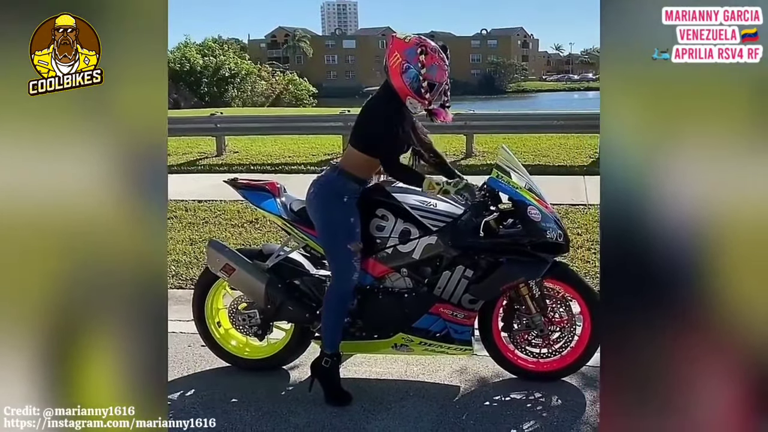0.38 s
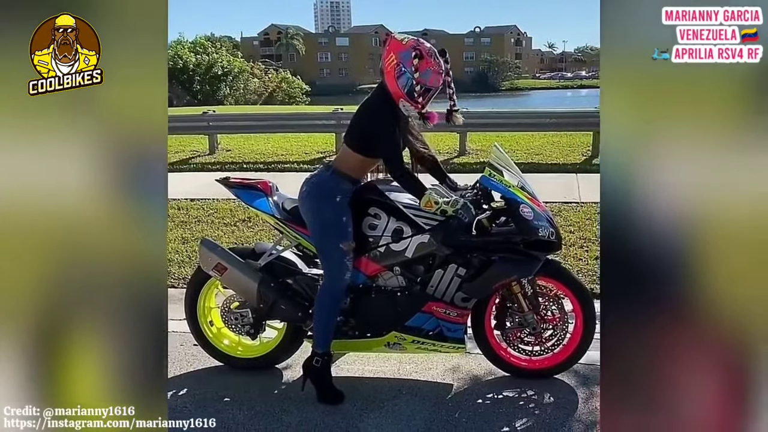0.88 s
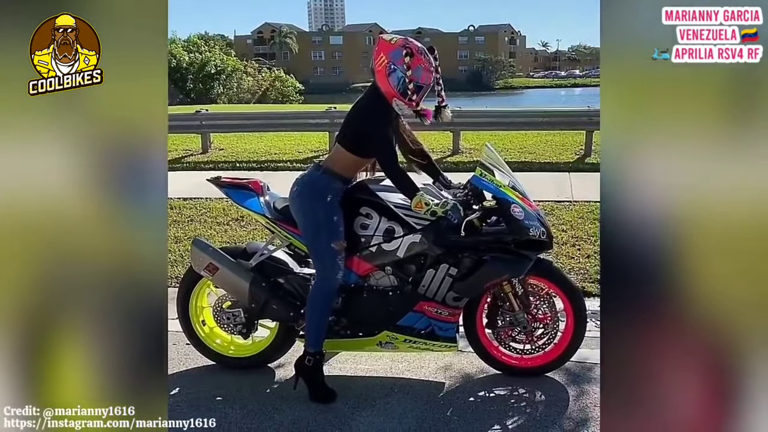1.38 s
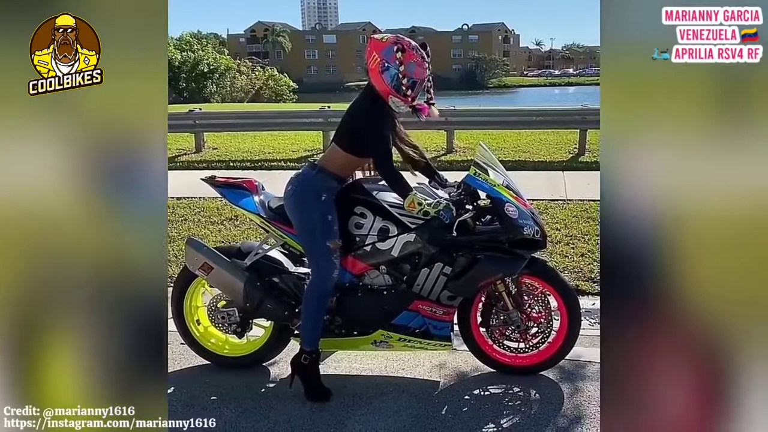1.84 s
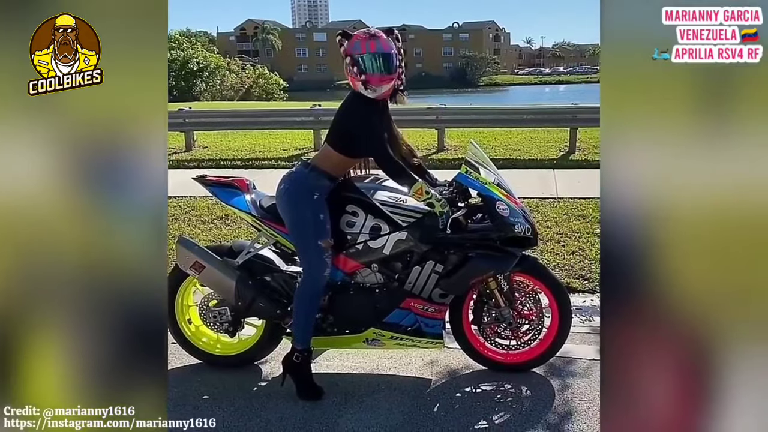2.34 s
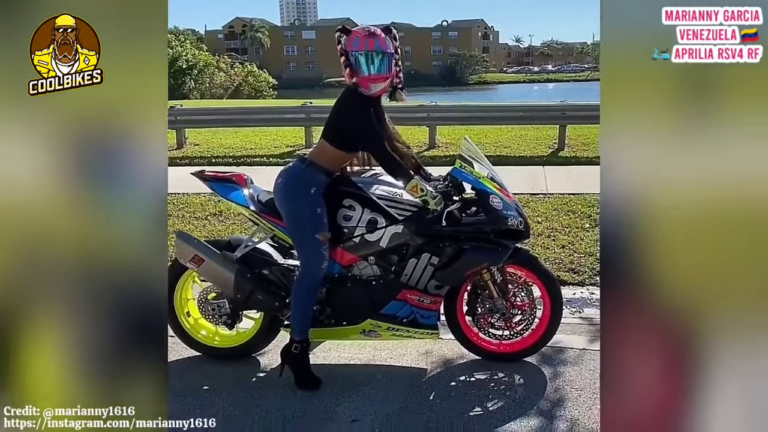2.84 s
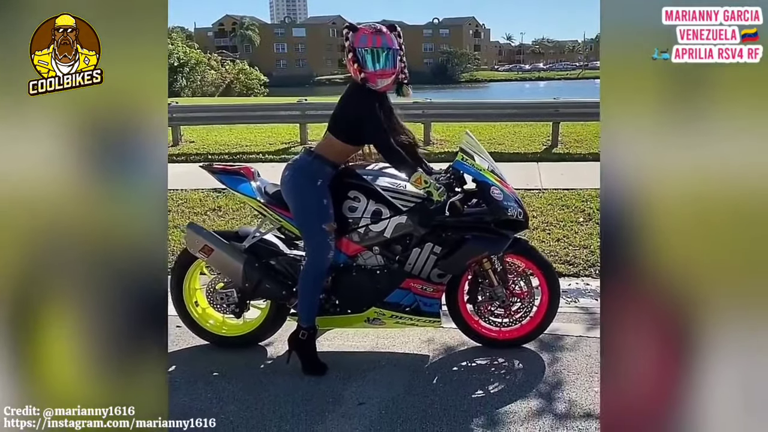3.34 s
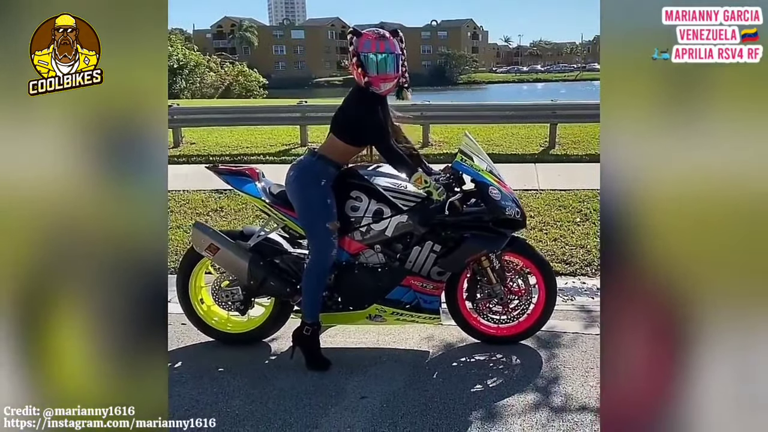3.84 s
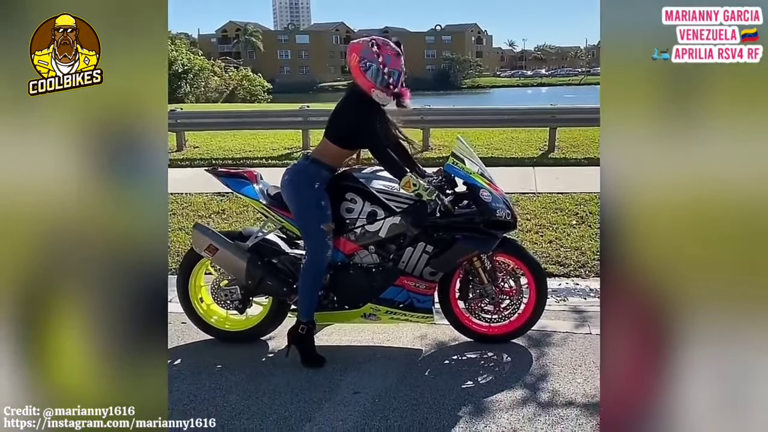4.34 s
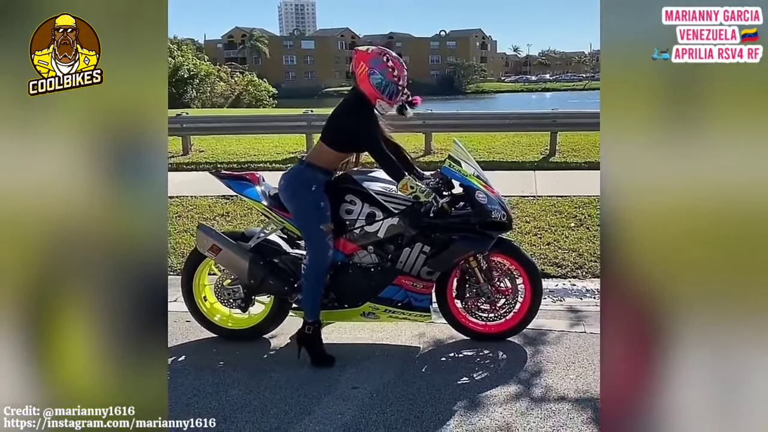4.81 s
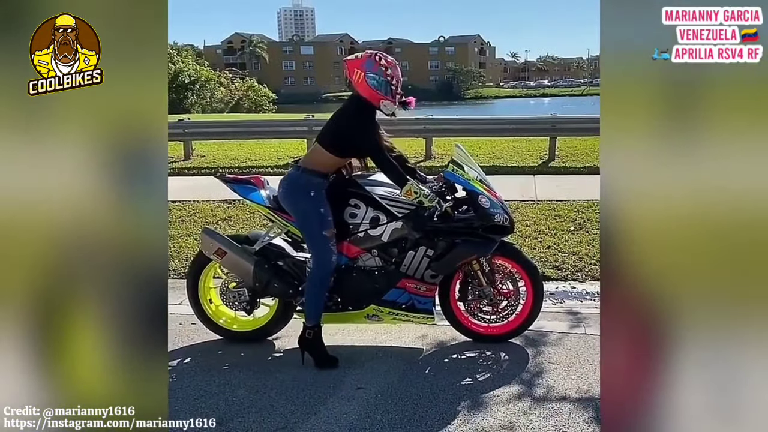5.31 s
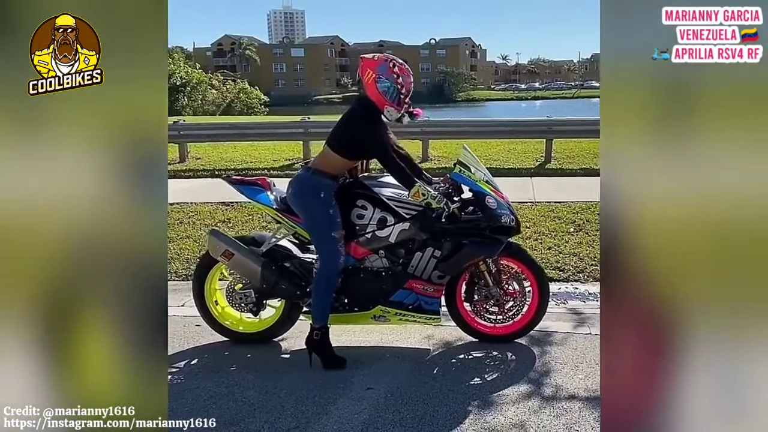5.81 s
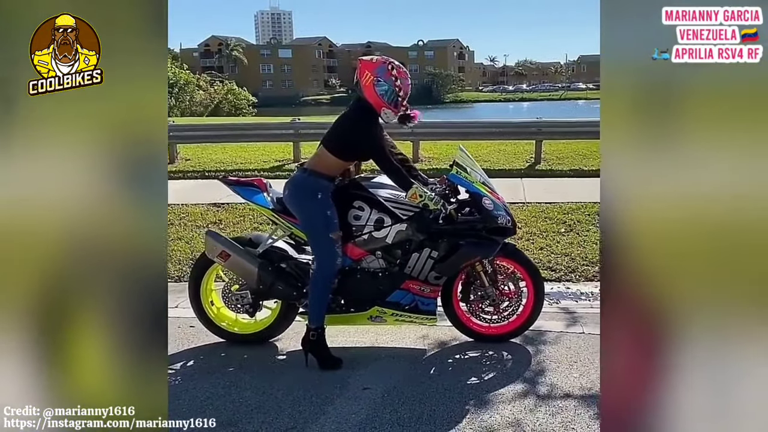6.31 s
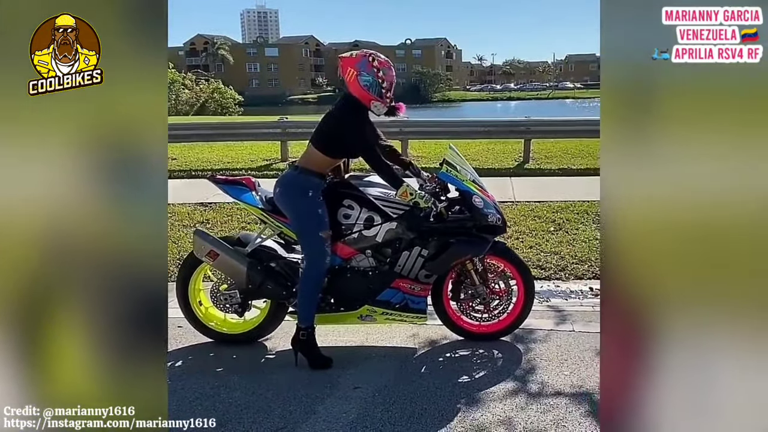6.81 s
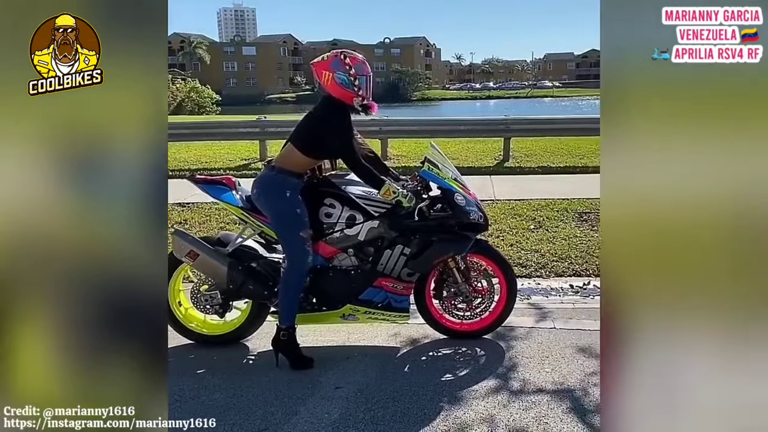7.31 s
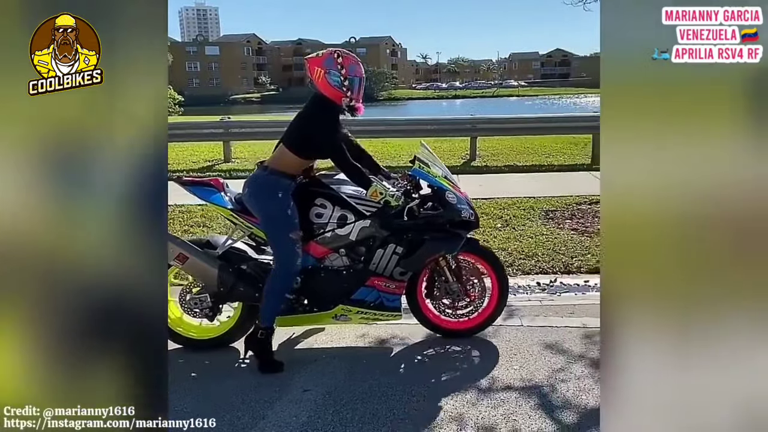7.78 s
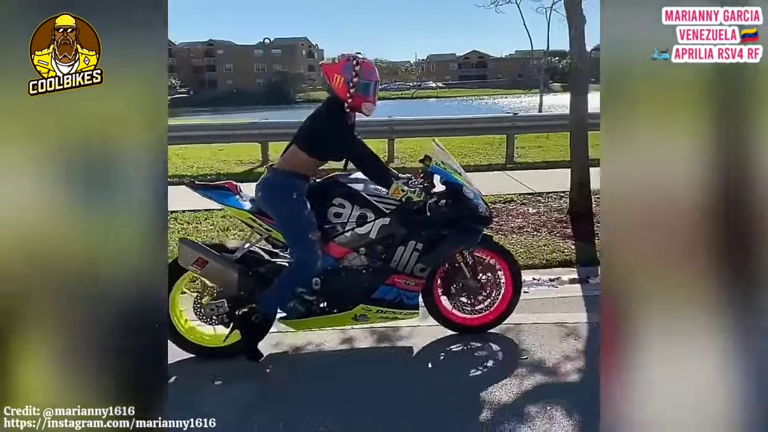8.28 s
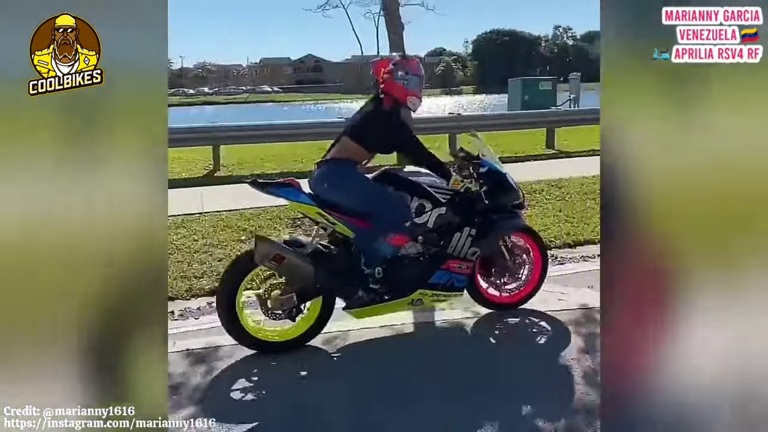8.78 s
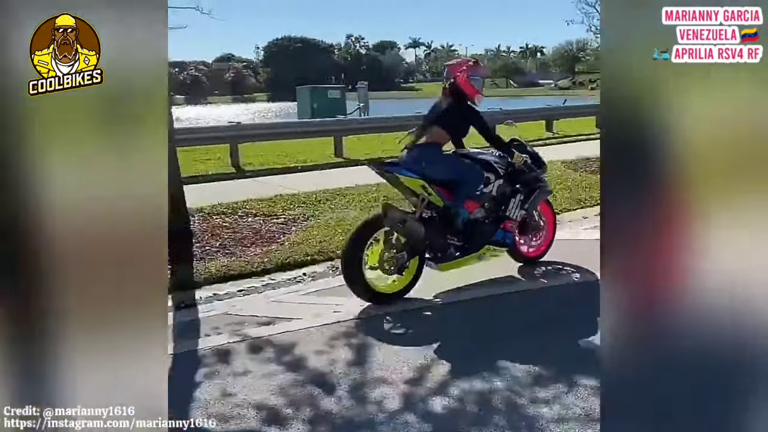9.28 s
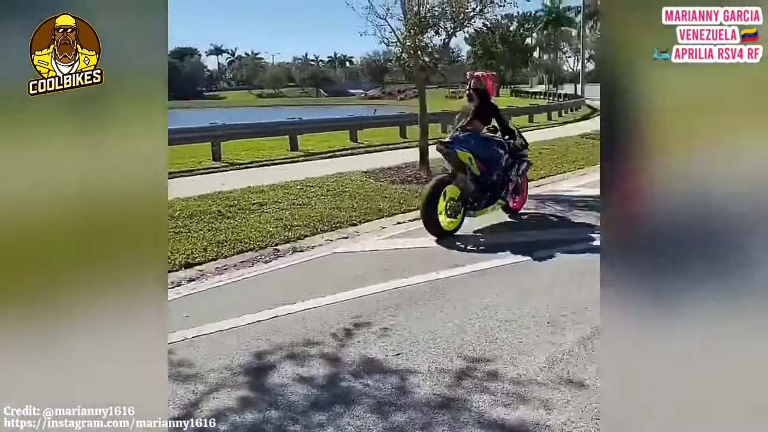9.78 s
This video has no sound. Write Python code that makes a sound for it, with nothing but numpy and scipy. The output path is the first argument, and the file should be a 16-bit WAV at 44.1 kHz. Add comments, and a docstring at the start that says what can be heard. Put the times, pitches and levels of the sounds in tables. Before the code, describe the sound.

Light wind and switch clicks, a starter whines through compressions, then a sport motorcycle fires, blips three times, idles, clunks into gear and rides off.

```python
"""A four-cylinder V motorcycle beside a quiet road: its starter whines through a few compressions, then
the engine catches, is blipped three times, idles, clunks into gear and pulls away. Wind and switches come first.
Uneven firing pulses make the low thump and the bark, and puffs of noise make the clatter; a gliding
stack of tones makes the starter, short noise bursts the contacts, and swelling low noise the wind."""
import sys
import numpy as np
from scipy import signal
from scipy.fft import rfft, irfft
from scipy.io import wavfile
from scipy.ndimage import uniform_filter1d

SR = 44100
rng = np.random.default_rng(int(sys.argv[2]) if len(sys.argv) > 2 else 0)


def linear_from_db(decibels):
    """Turn decibels (scalar or array-like) into linear amplitude factors; 0 gives 1."""
    return 10 ** (np.asarray(decibels, float) / 20)


def wav_record(signal):
    """Record a signal, one row per channel, as 16-bit PCM in the file named by sys.argv[1]."""
    frames = np.transpose(np.atleast_2d(signal))
    bounded = np.clip(frames, -1, 1)
    # unit amplitude maps onto the largest positive 16-bit level
    quanta = np.round(bounded * 32767).astype(np.int16)
    wavfile.write(sys.argv[1], SR, quanta)


N = 436149   # length in samples
TIME = np.arange(N) / SR
HZ = np.fft.rfftfreq(2 * N, 1 / SR) + 1e-3

# wind between gusts: (time [s], level [dB])
AIR = [(0.0, -40), (0.11, -40), (.6, -43), (1.2, -45), (1.9, -36), (2.2, -40), (4.5, -39), (5.5, -36),
       (9.89, -36)]
# gusts added to the wind: (time [s], level [dB])
GUSTS = [(.1, -48), (.25, -34), (.44, -38), (.5, -32.5), (.598, -37.5), (.72, -48), (.78, -52),
         (.846, -36.5), (.92, -40), (.99, -38), (1.1, -42), (1.21, -36.5), (1.316, -25), (1.38, -35),
         (1.465, -29)]
GUST_S = 0.02   # half-width
# colour of the wind: (pitch [Hz], level [dB])
WIND = [(15, -15), (27, -15), (38, -8.5), (59, 4.5), (413, -13), (466, -18), (498, -32), (600, -24.5),
        (780, -69), (1320, -120)]
# colour of the far hum: (pitch [Hz], level [dB])
AIR_COLOUR = [(180, -32.5), (300, -14), (386, -13), (877, -11.5), (1480, -27.5), (2090, -28.5),
              (2600, -32.5), (6600, -38), (7970, -38), (12200, -57), (13000, -58)]
HUM_DB = -51

# switches and the starter relay: (time [s], level [dB])
SWITCHES = [(0.18, -32.5), (0.229, -46), (1.285, -40), (1.534, -31)]
# colour of a switch: (pitch [Hz], level [dB])
TICK = [(700, -26), (1500, -4), (2200, 0), (3000, -1), (4500, -2), (6500, -4), (7700, -6), (9500, -10),
        (12000, -13), (13500, -30)]
# gear dogs engaging: (time [s], level [dB])
GEAR_DOGS = [(6.372, -19.5), (6.427, -29), (6.481, -31)]
# colour of the gear dogs: (pitch [Hz], level [dB])
CLACK = [(290, -10), (500, -6.5), (1180, -8), (2180, -16), (2500, -14), (2820, -9.5), (3920, -25),
         (4250, -30), (4870, -17.5), (6670, -18), (9120, -33), (11500, -36), (13000, -50)]

# first turn of the starter from rest: (start [s], length [s], whine at start [Hz], level [dB])
SPIN_UP = (1.533, .114, 300, -33.5)
SPIN_UP_HZ, SPIN_UP_BEND_S = 510, .03   # pitch gained, time constant of the gain
# starter strokes between compressions: (start [s], length [s], whine at start [Hz], level at start [dB])
STARTER = [(1.696, .056, 1330, -21), (1.784, .038, 1240, -26), (1.858, .056, 1280, -22),
           (1.975, .066, 1380, -21)]
SAG_SHARE, SAG_S = .55, .048   # share of pitch lost into a compression, time constant
SAG_DB_PER_S = 184   # fading into a compression
# tones in the gear whine: (multiple of the whine pitch, level [dB])
WHINE = [(1, -2), (2, 0), (2.5, -8), (3, -3), (4, -5), (5, -6), (6, -7), (7, -8), (8, -9)]
# colour of the starter body: (pitch [Hz], level [dB])
STARTER_BODY = [(260, -52), (450, -5.5), (504, -8.5), (760, -1.5), (950, -4.5), (1200, -6.5), (1450, -1),
                (1750, -2), (1950, -7), (2150, 0), (2410, -6), (2700, -3), (3150, -6), (3600, -9),
                (4200, -23), (6200, -17.5), (6600, -6), (6800, -18), (7050, -5), (7400, -22), (8000, -14),
                (9320, -33), (11400, -27.5), (13500, -46)]
STARTER_DRAG_DB = -43   # grinding that goes on between the strokes

# engine speed, two crank turns to a cycle: (time [s], four-stroke cycles per second [Hz])
SPEED = [(2.048, 11.5), (2.14, 13.8), (2.25, 23), (2.38, 23), (2.5, 16.9), (2.7, 15.2), (2.89, 14.8),
         (2.97, 23.9), (3.09, 28.3), (3.2, 23.8), (3.29, 25.6), (3.47, 37.9), (3.51, 36.6), (3.72, 23.9),
         (3.82, 20.9), (3.9, 22.5), (4.1, 42.4), (4.16, 41.9), (4.35, 26.8), (4.45, 23), (4.64, 18.4),
         (4.78, 16.9), (5.03, 16.1), (5.36, 15.2), (5.46, 15.6), (5.74, 14.7), (6.07, 13.9), (6.38, 13.6),
         (6.8, 13.6), (7.0, 13.8), (7.4, 13.4), (7.75, 13.3), (7.85, 17.4), (7.95, 27.9), (8.0, 30.5),
         (8.14, 30.0), (8.42, 30.5), (8.49, 30.0), (8.79, 29.2), (9.11, 28.8), (9.19, 28.8), (9.35, 28.3),
         (9.49, 28.2), (9.64, 27.3), (9.75, 27.0), (9.89, 28.2)]
# crank angle at which each cylinder fires: (angle [degrees])
FIRING_DEG = [0, 180, 425, 605]
# strength of each cylinder's pulse: (level [dB])
CYLINDER_DB = [0, -2.5, 0, -2.5]
# extra travel time through the longer header pipes, per cylinder: (delay [s])
HEADER_S = [.00025, 0, .00025, 0]
# each pulse lasts a fixed crank angle, so the weak bottom of the thump rises with speed:
# (waves per crank turn times two, that is per 720 degrees, level [dB])
PULSE_ORDERS = [(.5, -44), (1, -32), (2, -21), (3, -13), (4, -2), (5, 0), (6, -3), (7, -4), (8, 2), (10, 0),
                (12, 0), (40, 0)]
# pulses reflected back along the pipe: (delay [s], level [dB])
PIPE_ECHOES = [(.0135, -11)]
TAILPIPE_S, TAILPIPE_BACK = .0034, .6   # round trip of a sharp front, share that returns

# engine output before the throttle snaps add theirs: (time [s], thump [dB], valve gear clatter [dB])
RUNNING = [(2.05, -27, -40.5), (2.17, -25.5, -37.5), (2.205, -20, -34.5), (2.24, -6.5, -28.5),
           (2.32, -15.5, -34), (2.5, -17.5, -37.5), (2.86, -17.5, -36), (2.94, -11.5, -34),
           (2.99, -7, -27.5), (3.07, -16.5, -32), (3.13, -18, -34.5), (3.28, -23, -39), (3.34, -19, -35.5),
           (3.37, -15.5, -39), (3.46, -23, -37.5), (3.51, -30, -38.5), (3.62, -23, -39), (3.88, -21.5, -39),
           (3.95, -12, -32.5), (4.06, -28, -31.5), (4.36, -22.5, -38.5), (4.5, -28, -43.5),
           (4.75, -25.5, -49.5), (6.2, -26, -51), (7.6, -24, -49.5), (7.8, -24.5, -49.5), (7.95, -19, -40),
           (8.9, -20, -38.5), (9.89, -18.5, -40)]
# the shut-throttle bark swings more than the clatter: dB of bark per dB of clatter
QUIET_CLATTER_DB, QUIET_BARK_DB, BARK_FOLLOWS = -49.5, -48, 1.5
# throttle snapped open: (start [s], held [s], bark at start [dB], clatter at end of hold [dB])
THROTTLE = [(2.206, 0.077, -37, -43), (2.956, 0.088, -40, -46), (3.046, 0.053, -17.5, -48),
            (3.344, 0.131, -12.5, -31), (3.939, 0.13, -14.5, -29.5)]
OPEN_S, SHUT_S = 0.01, 0.0068   # rise of the opening, time constant of the decay after it shuts
BARK_SAG_DB_PER_S = 55   # the bark is hardest at first
CLATTER_GROWS_DB_PER_S = 11   # clatter builds while the throttle is open
# single uneven burns, surging or stumbling: (time [s], change of thump [dB])
LUMPS = [(2.4, 1.5), (2.436, -1), (2.46, -7), (2.766, -5), (2.79, 3), (3.304, 9), (3.724, 3), (3.772, -5),
         (3.822, 6), (3.864, -3), (3.91, 1), (4.52, 3), (4.586, 7.5), (4.65, 6), (4.7, 0), (5.17, 0.5),
         (5.545, -1), (5.63, 3), (5.74, -3), (5.895, 1.5), (6.11, 0.5), (6.54, -1.5), (6.77, 1.5),
         (6.975, 2.5), (7.13, 1), (7.165, 5), (7.27, 1), (7.41, 2), (7.76, 2), (7.8, -1)]
LUMP_S, LUMP_IN_BARK, LUMP_IN_CLATTER = 0.024, 1.32, 0.11   # half-width [s], shares of the dB
CLUTCH_S = 7.75   # the clutch bites
# the rich mixture after the start fades out: (time [s])
RICH_FADES_S = (3.0, 3.3)
OVERRUN_FROM_HZ, OVERRUN_FULL_HZ = 22, 32   # cycle rates at which fast shut-throttle running sets in
OVERRUN_BARK_DB = -1.5

# scatter of firing strength [dB]
SLOW_SPREAD_DB, FAST_SPREAD_DB, OPEN_SPREAD_DB = 3.0, .7, 2.6
EVEN_FROM_HZ, EVEN_AT_HZ = 21, 29   # burning evens out between these cycle rates
UNLOADED_SPREAD_DB = 1.7   # least scatter while the engine spins free
RICH_UNTIL_S, RICH_SPREAD_DB = 2.95, 1.7   # the rich starting mixture burns evenly
WAVER_PER_DB = .006   # share by which uneven burning makes the speed waver
TURBULENT_BASE, TURBULENT_PER_DB = .07, .15   # turbulent share of the bark grows with the scatter
OVERRUN_TURBULENT, RICH_TURBULENT = .3, .25   # added shares
OPEN_TURBULENT = .33   # whole share with the throttle open

# thump, running free: (pitch [Hz], level [dB])
THUMP = [(18, -98), (33, -61), (45, 16), (59, 10), (100, 12.5), (135, 7.5), (185, 8.5), (240, -0.5),
         (310, -6.5), (350, -1.5), (389, -26.5), (420, -11.5), (550, -37), (920, -120)]
# thump, cold and rich just after the start: (pitch [Hz], level [dB])
RICH_THUMP = [(18, -96), (33, -63), (45, 9), (59, 11), (80, 7.5), (100, 15.5), (135, 11.5), (185, 9.5),
              (240, 5), (310, 3.5), (350, 0.5), (389, -19), (420, -8), (550, -44), (920, -120)]
# thump, pulling or throttle open: (pitch [Hz], level [dB])
LOADED_THUMP = [(18, -84), (33, -70), (59, 12), (100, 12.5), (135, 8.5), (152, 7.5), (230, -1.5),
                (270, -4.5), (308, -9.5), (348, -6.5), (389, -7), (420, -7.5), (550, -58), (920, -120)]
# thump, spinning fast on a shut throttle: (pitch [Hz], level [dB])
OVERRUN_THUMP = [(33, -70), (70, 17), (120, 5), (170, 5), (210, 5.5), (270, 2), (340, -3), (389, -16),
                 (420, -8), (550, -48), (920, -120)]
# bark, running free: (pitch [Hz], level [dB])
BARK = [(220, -17), (380, 7), (397, -3.5), (504, 11), (547, 5), (725, 2), (757, 5), (801, -3.5), (920, -5),
        (1200, -6.5), (1700, -28), (2210, -26), (3740, -120)]
# bark, pulling away: (pitch [Hz], level [dB])
LOADED_BARK = [(220, -19), (330, -32), (380, -13), (400, 2), (504, 10.5), (547, 8), (650, 8), (725, 12.5),
               (765, 3.5), (801, -11.5), (920, 0), (1200, -14), (1700, -32), (2210, -31.5), (3740, -120)]
# bark, throttle open: (pitch [Hz], level [dB])
OPEN_BARK = [(220, -20), (380, -54.5), (431, -0.5), (550, -0.5), (589, -4.5), (627, -8), (734, 2.5),
             (875, -18.5), (1130, -11), (1700, -26.5), (2210, -22), (3740, -120)]
# valve gear clatter: (pitch [Hz], level [dB])
CLATTER = [(880, -6.5), (1500, 7.5), (1850, 3), (2010, 6), (2700, 4), (3760, -2), (4090, -12.5),
           (5090, -4.5), (5640, -6), (6770, -4.5), (7780, -8), (8760, -13.5), (12000, -16.5), (12700, -49),
           (13500, -10)]
# clatter, throttle open: (pitch [Hz], level [dB])
OPEN_CLATTER = [(880, 1.5), (1500, 17.5), (2400, 3), (2580, -2), (2880, 10.5), (3870, 0), (4500, -11),
                (5050, -7), (5600, 3.5), (11500, -9), (12800, -9), (13500, -116)]
# open intake at high revs: (pitch [Hz], level [dB])
RASP = [(3000, -47), (4050, -38), (4400, 5), (4750, 4), (5100, 5), (5450, -28), (6800, -11), (9000, -38)]
RASP_DB = -2.5   # against the open clatter, reached at the full cycle rate
RASP_FROM_HZ, RASP_FULL_HZ = 30.5, 34
# sharp pulse fronts, throttle open or pulling: (pitch [Hz], level [dB])
CRACKLE = [(900, -9), (1300, 5), (1750, -13), (2300, 12), (2600, -9), (2950, 5), (3250, -14), (3500, -1),
           (3900, -45), (6000, -64)]
CRACKLE_DB, PULLING_CRACKLE_DB = 2, -6   # against the open clatter, against the clatter when pulling
# gear pairs: (teeth meshing per cycle, level [dB])
MESH_ORDERS = [(44.5, -4), (51, -5), (79, -5), (92.5, 0)]
# casing resonances: (pitch [Hz], width [Hz] before limiting to 30-120, level [dB])
CASING = [(1276, 140, 5), (2360, 190, 7), (3760, 50, -8), (4530, 89, -2.5), (4850, 150, -5),
          (5230, 49, -9.5)]
MESH_DB, CASING_DB = -7, -7   # against the clatter

# late burns popping in the pipe: (time [s], crack peak [dB], thump peak [dB])
POPS = [(4.397, -16.5, -32), (5.402, -30, -11), (5.93, -38, -13), (6.615, -35, -13), (6.996, -22, -14),
        (7.563, -40, -11)]
# ring of a pop in the pipe: (pitch [Hz], level [dB])
POP_RING = [(200, -20), (300, -6), (400, -10), (500, 4), (600, -10), (850, -7), (1000, -22), (1500, -45),
            (3000, -100)]
SHARP_POP_DB = -15   # a pop this strong passes the silencer undulled

# balance of the two microphone ports: (pitch [Hz], left over right [dB])
PORT_BALANCE = [(60, -1.6), (130, 0.2), (280, -1), (600, 4), (1300, 0), (2820, 0), (6080, 1), (13100, -0.8)]
# timing of the two ports: (pitch [Hz], left leads by [radians])
PORT_PHASE = [(0, 0), (600, 0.5), (1300, .45), (1890, 0.4), (3200, 1.1), (4130, 1.2), (5510, 0.1),
              (7150, -0.1), (7490, 0.0), (8350, 3.3), (8870, 3.2), (9910, 0.1), (11600, 0.0), (12500, -3.1),
              (13400, -3.1)]
# how alike the two ports are: (pitch [Hz], likeness 0-1)
LIKENESS = [(60, 0.94), (250, 0.96), (520, 0.9), (1100, 0.78), (2000, .78), (4470, 0.72), (8000, .6),
            (13100, 0.6)]


def rms_one(x):
    """Scale to an average power of 1."""
    return x / np.sqrt(np.mean(x ** 2) + 1e-20)


def in_time(rows):
    """Read each column of a time table at every sample."""
    s, *columns = np.transpose(rows)
    return [np.interp(TIME, s, c) for c in columns]


def at_hz(points, hz):
    """Read a pitch table on a logarithmic pitch axis."""
    table_hz, value = np.array(points).T[:2]
    return np.interp(np.log(hz), np.log(table_hz), value)


def coloured(x, spectrum):
    """Filter with the given colour, responding as early as possible (minimum phase)."""
    hz = np.fft.rfftfreq(16384, 1 / SR) + 1
    fold = irfft(np.log(linear_from_db(at_hz(spectrum, hz))))
    fold[1:8192] *= 2
    fold[8193:] = 0   # only the part after time zero stays
    response = irfft(np.exp(rfft(fold)))[:8192]
    return signal.fftconvolve(x, response)[:N]


def evened(x, span_s):
    """Divide out the slow level, so that a curve can set it."""
    return x / np.sqrt(uniform_filter1d(x ** 2, size=int(span_s * SR)) + 1e-12)


def blend(a, b, share):
    """Cross-fade from one evened layer to another."""
    return (1 - share) * evened(a, span_s=0.115) + share * evened(b, span_s=0.16)


def drift(rate_hz):
    """Wander slowly at random, with spread 1, computed at every 40th sample."""
    r = np.exp(-80 * np.pi * rate_hz / SR)
    noise = rng.standard_normal(N // 40 + 2002)
    slow = signal.lfilter([1], [1, -2 * r, r * r], noise)[2000:]   # skip the settling
    return np.interp(np.arange(N) / 40, np.arange(len(slow)), rms_one(slow))


def dying(hits, t60):
    """Turn each hit into an envelope that falls by 60 dB in t60 seconds."""
    return signal.lfilter([1], [1, -linear_from_db(-60 / (t60 * SR))], hits + 1e-18)


def bumps(rows, width_s):
    """Add up bell-shaped swells at the given times and heights."""
    return sum(height * np.exp(-((TIME - s) / width_s) ** 2) for s, height in rows)


def air():
    """Lumpy low wind, partly its own in each port, over a smooth far hum."""
    lumps = linear_from_db(3 * drift(27)) * rng.standard_normal((3, N))
    shared, left, right = (coloured(x, WIND) for x in lumps)
    wind = rms_one(shared + 0.34 * np.array([left, right]))
    hum = np.array([coloured(x, AIR_COLOUR) for x in rng.standard_normal((3, N))])
    hum = rms_one(hum[0] + 3.5 * hum[1:])   # mostly separate in the two ports
    level = linear_from_db(in_time(AIR)[0]) + bumps([(s, linear_from_db(db)) for s, db in GUSTS], GUST_S)
    return level * wind + linear_from_db(HUM_DB + 2 * drift(2)) * hum


def contacts(rows, colour, t60):
    """Each contact is a short clack of noise in the colour of the part."""
    s, level_db = np.transpose(rows)
    hit = np.zeros(N)
    hit[(s * SR).astype(int)] = linear_from_db(level_db - 6.0)   # leaves room for the peaks of the noise
    return rms_one(coloured(rng.standard_normal(N), colour)) * dying(hit, t60)


def clicks():
    """Switches give bright short ticks, gear dogs duller and longer clacks."""
    return contacts(SWITCHES, TICK, t60=0.042) + contacts(GEAR_DOGS, CLACK, t60=0.1)


def starter():
    """The gear whine glides with motor speed and slows into each compression, over grinding noise."""
    level, whine_hz = np.zeros(N), np.zeros(N)
    for k, (start, length, from_hz, level_db) in enumerate([SPIN_UP] + list(STARTER)):
        since = np.clip(TIME - start, 0, length)
        fade_in = np.clip((TIME - start) / 0.0043, 0, 1)
        fade_out = np.exp(-np.maximum(TIME - start - length, 0) / 0.005)
        level += fade_in * fade_out * linear_from_db(level_db - SAG_DB_PER_S * since * (k > 0))
        if k == 0:   # the first turn speeds up
            glide = SPIN_UP_HZ * (1 - np.exp(-since / SPIN_UP_BEND_S))
        else:
            glide = -SAG_SHARE * from_hz * (1 - np.exp(-since / SAG_S))
        whine_hz[TIME >= start] = (from_hz + glide)[TIME >= start]
    turn = 2 * np.pi * np.cumsum(whine_hz * (1 + 0.022 * drift(90))) / SR
    tones = sum(linear_from_db(db + 2.5 * drift(70)) * np.sin(k * turn) for k, db in WHINE)
    whine = coloured(tones, STARTER_BODY)
    whine = whine * np.clip((TIME - SPIN_UP[0]) / .04, 0, 1)   # the teeth sing once the motor turns
    grind = coloured(rng.standard_normal(N), STARTER_BODY)
    drag = linear_from_db(STARTER_DRAG_DB) * (TIME > SPIN_UP[0]) * (TIME < sum(STARTER[-1][:2]))
    return level * rms_one(whine) + (level * linear_from_db(-8) + drag) * rms_one(grind)


def throttle():
    """Opening 0-1 and the gains of bark and clatter that each snap of the throttle adds."""
    out = np.zeros((3, N))
    for start, held, bark_db, clatter_db in THROTTLE:
        since = np.clip(TIME - start, 0, held)
        opening = np.clip(since / OPEN_S, 0, 1) ** 2
        closing = np.exp(-np.maximum(TIME - start - held, 0) / SHUT_S)
        bark_gain = linear_from_db(bark_db - BARK_SAG_DB_PER_S * since)
        clatter_gain = linear_from_db(clatter_db - CLATTER_GROWS_DB_PER_S * (held - since))
        out += opening * closing * np.array([np.ones(N), bark_gain, clatter_gain])
    return out


def engine_state():
    """How far the throttle is open, and the shares of pulling, load, shut-throttle spin and richness."""
    opened = throttle()[0]
    pulling = np.clip((TIME - CLUTCH_S) / .2, 0, 1)
    load = np.minimum(pulling + opened, 1)
    overrun = (1 - load) * np.interp(in_time(SPEED)[0], [OVERRUN_FROM_HZ, OVERRUN_FULL_HZ], [0, 1])
    richness = np.interp(TIME, RICH_FADES_S, [1, 0])
    return opened, pulling, load, overrun, richness


def scatter_db():
    """Burning is lumpy when slow, even when fast or rich, ragged under an open throttle."""
    spreads = [SLOW_SPREAD_DB, FAST_SPREAD_DB]
    shut = np.interp(in_time(SPEED)[0], [EVEN_FROM_HZ, EVEN_AT_HZ], spreads)
    shut = np.where(TIME < CLUTCH_S, np.maximum(shut, UNLOADED_SPREAD_DB), shut)
    shut = np.where(TIME < RICH_UNTIL_S, np.minimum(shut, RICH_SPREAD_DB), shut)
    return shut + throttle()[0] * (OPEN_SPREAD_DB - shut)


def firings():
    """One pulse per cylinder at uneven crank angles, strength and timing scattering with rough burning:
    sharp clicks in time, and blunt pulses laid out degree by degree of crank angle."""
    on = TIME > SPEED[0][0]
    waver = 1 + WAVER_PER_DB * scatter_db() * drift(6.17)
    cycles = np.cumsum(in_time(SPEED)[0] * waver * on) / SR
    degrees = (720 * np.arange(int(cycles[-1]) + 1)[:, None] + FIRING_DEG).ravel()
    at = np.interp(degrees / 720, cycles[on], TIME[on])
    count = len(at)
    spread_db = np.interp(at, TIME, scatter_db())
    strength = linear_from_db(np.resize(CYLINDER_DB, count) + spread_db * rng.standard_normal(count))
    slip = np.round(1.2 * spread_db * rng.standard_normal(count)).astype(int)   # degrees late
    degrees = np.maximum(degrees + slip, 0)
    at = np.interp(degrees / 720, cycles[on], TIME[on]) + np.resize(HEADER_S, count)
    sharp, by_angle = np.zeros(N), np.zeros(degrees[-1] + 1440)
    sharp[np.minimum(at * SR, N - 1).astype(int)] = strength
    by_angle[degrees] = strength
    orders = np.fft.rfftfreq(len(by_angle), 1 / 720) + 1e-3
    soft = linear_from_db(at_hz(PULSE_ORDERS, orders)) / (1 + (orders / 60) ** 4)
    blunt = irfft(rfft(by_angle) * soft, len(by_angle))
    return sharp, np.interp(720 * cycles, np.arange(len(blunt)), blunt) * on


def gear_whine():
    """Teeth mesh at a multiple of engine speed once the clutch bites; casing resonances hum unsteadily."""
    speed = in_time(SPEED)[0]
    mesh = 0
    for teeth, db in MESH_ORDERS:
        waver = 1 + .009 * drift(60) + .006 * drift(3)
        turn = 2 * np.pi * np.cumsum(teeth * speed * waver) / SR
        mesh = mesh + linear_from_db(db + 2.5 * drift(6) + 3 * drift(40)) * np.sin(turn)
    casing = 0
    for hz, width_hz, db in CASING:
        r = np.exp(-np.pi * np.clip(width_hz, 30, 120) / SR)
        resonance = [1, -2 * r * np.cos(2 * np.pi * hz / SR), r * r]
        hum = signal.lfilter([1, 0, -1], resonance, rng.standard_normal(N))
        casing = casing + linear_from_db(db + 2.7 * drift(27) + 2 * drift(4)) * rms_one(hum)
    return linear_from_db(MESH_DB) * rms_one(mesh) * (TIME > CLUTCH_S) + linear_from_db(CASING_DB) * rms_one(casing)


def exhaust_thump(blunt, gas, turbulent):
    """Blunt pulses ring the pipe in a colour that follows the load, with some rumbling gas."""
    _, _, load, overrun, richness = engine_state()
    colours = (THUMP, RICH_THUMP, LOADED_THUMP, OVERRUN_THUMP)
    free, rich, loaded, spinning = (evened(coloured(-blunt, c), span_s=.15) for c in colours)
    free = free + richness * (rich - free)
    rumble = evened(coloured(gas, THUMP), span_s=0.05)
    return (1 - load - overrun) * free + load * loaded + overrun * spinning + turbulent ** 2 * rumble


def intake_bark(pulses, fronts, gas, turbulent):
    """Regular pulses and turbulent gas share the bark; under load the regular part reaches higher."""
    opened, pulling, load, _, _ = engine_state()
    clean = 0
    for share, x, top_hz, colour in ((1 - load, pulses, 850, BARK), (pulling, pulses, 2200, LOADED_BARK),
                                     (opened, fronts, 2200, OPEN_BARK)):
        dulled = signal.sosfilt(signal.butter(3, top_hz, fs=SR, output="sos"), x)
        clean = clean + share * evened(coloured(dulled, colour), span_s=0.125)
    swirl = blend(coloured(gas, BARK), coloured(gas, OPEN_BARK), opened)
    return np.sqrt(1 - turbulent) * clean + np.sqrt(turbulent) * swirl


def valve_clatter(metal, crackle):
    """Puffing noise in the colour of the valve gear, with gear whine, and crackle when pulling."""
    opened, pulling, *_ = engine_state()
    clatter = blend(coloured(metal, CLATTER), coloured(metal, OPEN_CLATTER), opened)
    return clatter + gear_whine() + pulling * linear_from_db(PULLING_CRACKLE_DB) * crackle


def intake_rasp(pulses, fronts, crackle):
    """Bursts of noise and sharp fronts rasp through the intake at high revs, beside the crackle."""
    blast = evened(dying(pulses, t60=.025), span_s=.08) * rng.standard_normal(N)
    growth = np.interp(in_time(SPEED)[0], [RASP_FROM_HZ, RASP_FULL_HZ], [.1, 1])
    rasp = evened(coloured(blast + 4 * fronts, RASP), span_s=.08)
    return linear_from_db(RASP_DB) * growth * rasp + linear_from_db(CRACKLE_DB) * crackle


def engine():
    """Firing pulses ring the pipe low, bark through the intake, and gate the clatter."""
    opened, _, _, overrun, richness = engine_state()
    _, open_bark, open_clatter = throttle()
    thump_db, clatter_db = in_time(RUNNING)
    bark_db = QUIET_BARK_DB + BARK_FOLLOWS * (clatter_db - QUIET_CLATTER_DB)
    bark_db = bark_db + OVERRUN_BARK_DB * overrun
    lump_db = bumps(LUMPS, LUMP_S)
    turbulent = TURBULENT_BASE + TURBULENT_PER_DB * scatter_db()
    pulses, blunt = firings()
    blunt = blunt + sum(linear_from_db(db) * np.interp(TIME - s, TIME, blunt) for s, db in PIPE_ECHOES)
    blunt = blunt * linear_from_db(2.5 * turbulent * drift(9))   # rough burning makes the level lumpy
    turbulent = turbulent + OVERRUN_TURBULENT * overrun + RICH_TURBULENT * richness
    turbulent = turbulent + np.minimum(opened, 1) * (OPEN_TURBULENT - turbulent)

    puff = evened(dying(pulses, t60=.06), span_s=.12)   # gas flow after each valve opening
    gas = rng.standard_normal(N) * (puff + .5 - .3 * opened)
    metal = rng.standard_normal(N) * (puff + 1.4 - .9 * opened)
    # sharp fronts run back and forth in the tailpipe
    tailpipe = np.r_[1, np.zeros(int(TAILPIPE_S * SR) - 1), -TAILPIPE_BACK]
    fronts = signal.lfilter([1], tailpipe, pulses + 1e-18)
    crackle = evened(coloured(fronts, CRACKLE), span_s=.08)

    bark_gain = (linear_from_db(bark_db) + open_bark) * linear_from_db(LUMP_IN_BARK * lump_db)
    clatter_gain = (linear_from_db(clatter_db) + open_clatter) * linear_from_db(LUMP_IN_CLATTER * lump_db)
    out = linear_from_db(thump_db + lump_db) * exhaust_thump(blunt, gas, turbulent)
    out = out + bark_gain * intake_bark(pulses, fronts, gas, turbulent)
    out = out + clatter_gain * valve_clatter(metal, crackle)
    out = out + open_clatter * intake_rasp(pulses, fronts, crackle)
    return np.clip((TIME - SPEED[0][0]) / 0.0071, 0, 1) * out


def pops():
    """A late burn is one strong pulse in the pipe with a short puff of gas; strong ones stay sharp."""
    s, crack_db, thump_db = np.transpose(POPS)
    at = (s * SR).astype(int)
    low, high, sharp = np.zeros((3, N))
    low[at] = linear_from_db(thump_db)
    high[at] = linear_from_db(crack_db)
    sharp[at] = linear_from_db(4 * crack_db - 3 * SHARP_POP_DB)   # falls away fast for weaker pops
    sharp = sharp + .2 * rng.standard_normal(N) * dying(sharp, t60=.04)
    high = high + .07 * rng.standard_normal(N) * dying(high, t60=.12)
    unit = np.eye(1, N)[0]   # a single click, to scale each ring to peak 1
    out = 0
    for x, colour in ((low, THUMP), (high, POP_RING), (sharp, OPEN_BARK)):
        out = out + coloured(x, colour) / np.abs(coloured(unit, colour)).max()
    return out


def ports(x):
    """Two microphone ports: level and phase differ by pitch, and scattered echoes make them less alike."""
    echoes = np.zeros(N)
    echoes[(rng.uniform(.003, .05, 24) * SR).astype(int)] = rng.choice([-1, 1], 24) / np.sqrt(24)
    alike = np.clip(at_hz(LIKENESS, HZ), 0, 1)
    side = np.sqrt((1 - alike) / (1 + alike)) * rfft(echoes, 2 * N)
    lead = np.interp(HZ, *np.transpose(PORT_PHASE))
    tilt = linear_from_db(at_hz(PORT_BALANCE, HZ) / 2) * np.exp(.5j * lead)   # half to each port
    both = np.array([tilt * (1 + side), (1 - side) / tilt])
    return irfft(rfft(x, 2 * N) * both)[:, :N]


def scene():
    """The motorcycle through the two ports, over the air."""
    return air() + ports(clicks() + starter() + engine() + pops())


def top_cut(x):
    """Nothing passes above the cut-off."""
    return signal.sosfilt(signal.butter(12, 13740, fs=SR, output="sos"), x)


def record(dry):
    """The mix is turned up and its peaks are rounded off."""
    mix = np.tanh(1.282 * dry)
    return top_cut(mix)


dry = scene()
out = record(dry)
wav_record(out)
```